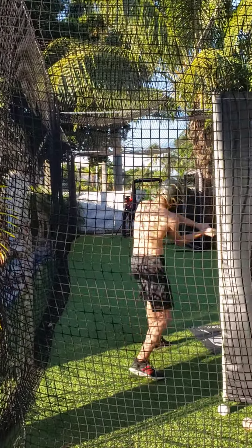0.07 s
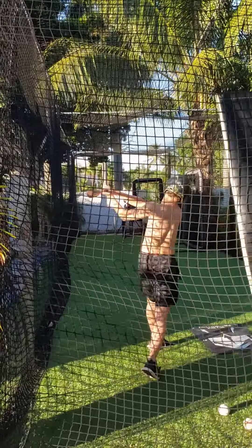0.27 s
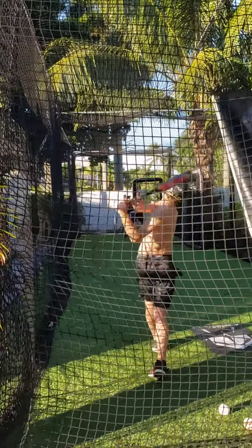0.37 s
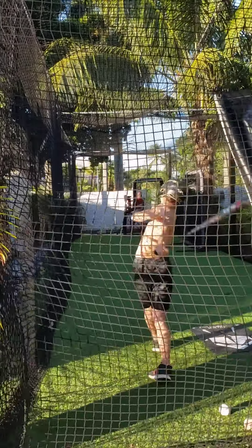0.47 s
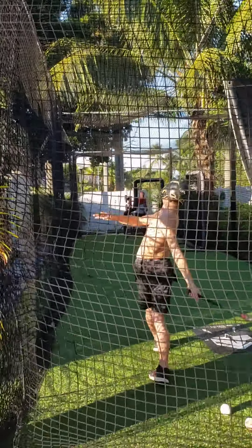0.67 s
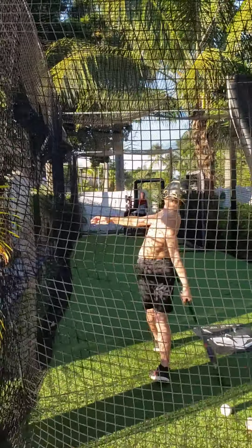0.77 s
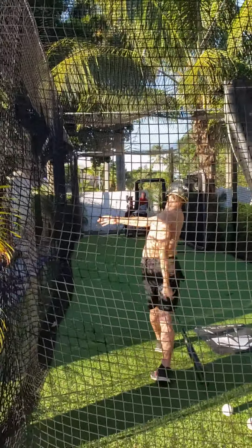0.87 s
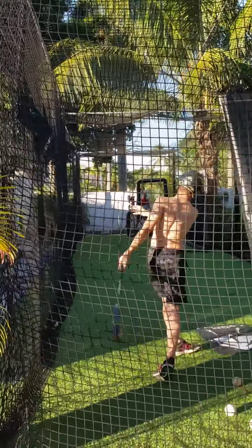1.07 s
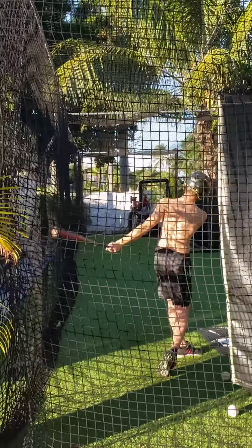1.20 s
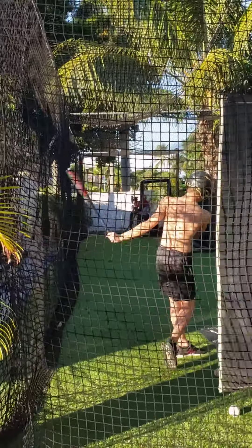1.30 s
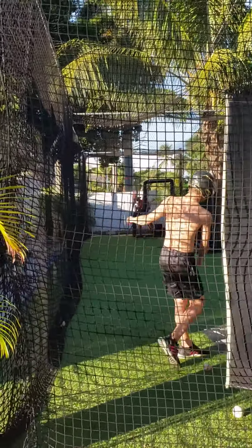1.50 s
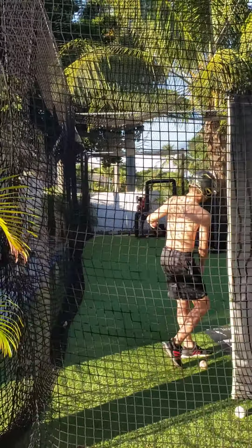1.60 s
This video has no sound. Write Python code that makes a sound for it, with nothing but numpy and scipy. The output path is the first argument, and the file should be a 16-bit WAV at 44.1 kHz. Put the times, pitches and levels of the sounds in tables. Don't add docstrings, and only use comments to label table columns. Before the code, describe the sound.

Outdoor batting cage on a phone microphone: short clanging bat hit, explosive close tarp smack with rustle and cord snap, fading metallic ring, then small dull ball thuds and grass brushes over low hum and faint leaves.

```python
import sys
import numpy as np
from scipy import signal
from scipy.fft import rfft, irfft
from scipy.io import wavfile
from scipy.ndimage import uniform_filter1d

SR = 44100
rng = np.random.default_rng(int(sys.argv[2]) if len(sys.argv) > 2 else 0)


def inscribe(sig):
    pcm = np.round(np.clip(np.atleast_2d(sig).T, -1, 1) * 32767)
    wavfile.write(sys.argv[1], SR, pcm.astype(np.int16))


def invert_db(level):
    return 10 ** (np.asarray(level, dtype=float) / 20)


N = 72765
T = np.arange(N) / SR
HZ = np.maximum(np.fft.rfftfreq(N, 1 / SR), 1)


def over_hz(points):
    p = np.array(points, float)
    return np.interp(np.log(HZ), np.log(p[:, 0]), p[:, 1])


def over_time(points):
    p = np.array(points, float)
    return np.interp(T, p[:, 0], p[:, 1])


# (frequency [Hz], likeness [0-1, clipped])
PORT_LIKENESS = [(60, 2.5), (300, 1.12), (700, 0.7), (1500, .5), (5000, 0.05), (14000, 0.08)]
# (frequency [Hz], phase [rad])
PORT_PHASE = [(300, 0), (2700, -1.3), (4300, 3), (5000, 1), (6200, 7), (8400, -4.5), (12000, -1),
              (16000, -2)]
# (frequency [Hz], left over right [dB])
PORT_BALANCE = [(60, 2.5), (110, 0.5), (200, 2), (380, 2.5), (700, 0), (1290, 3), (2380, 2), (4400, 2.5),
                (8120, 4.5), (15000, -3)]


def ports(a, b, far=False):
    least_likeness = 0.23 if far else 0
    likeness = np.clip(over_hz(PORT_LIKENESS), least_likeness, 1)
    balance = invert_db(over_hz(PORT_BALANCE) / 2)
    shift = 1 if far else np.exp(-1j * over_hz(PORT_PHASE))
    right = likeness * a * shift + np.sqrt(1 - likeness ** 2) * b
    return np.array([irfft(a * balance, N), irfft(right / balance, N)])


def walk(rate_hz):
    k = max(int(SR / rate_hz), 1)
    held = rng.standard_normal(999)[np.arange(N) // k % 999]
    return 0.78 * uniform_filter1d(uniform_filter1d(held, k), k)


def hiss(tone, grain_db=0., flicker_db=0., far=False):
    grains = rng.standard_normal((2, N)) * invert_db(grain_db * rng.exponential(size=N))
    left, other = rfft(grains) * invert_db(over_hz(tone))
    spectrum = rfft(ports(left, other, far))
    out = 0
    for octave in range(4, 15):
        share = np.clip(1 - abs(np.log2(HZ) - octave), 0, 1)
        out = out + irfft(spectrum * share, N) * invert_db(flicker_db * walk(13.59))
    return out / out.std()


def swell(rows):
    power = np.zeros(N)
    for start, db, rise, t60 in rows:
        u = np.maximum(T - start, 0)
        attack = np.sin(np.pi / 2 * np.minimum(u / rise, 1))
        power += (invert_db(db - 60 * u / t60) * attack) ** 2
    return np.sqrt(power)


def ring(start, db, hz, t60, sag=0.):
    u = np.maximum(T - start, 0)
    return invert_db(db - 60 * u / t60) * np.sin(2 * np.pi * (hz * u + sag * u ** 2 / 2))


def push(start, db, ms):
    u = (T - start) / (ms / 1000)
    pulse = np.where((u > 0) & (u < 1), np.sin(np.pi * u), 0)
    return invert_db(db) * pulse * np.pi / 2 / (ms / 1000 * SR)


# (frequency [Hz], density [dB per Hz])
GARDEN_TONE = [(25, 8.5), (50, 3), (120, -4.5), (200, -12), (340, -19), (450, -34.5), (800, -45.5)]
# (time [s], level [dB])
GARDEN_LEVEL = [(0, -43), (.15, -38.5), (.5, -44), (.9, -48), (1.1, -48.5), (1.4, -51.5), (1.65, -52)]


def garden_hum():
    return hiss(GARDEN_TONE, 0.3, 1.7) * invert_db(over_time(GARDEN_LEVEL))


# (frequency [Hz], density [dB per Hz])
LEAVES_TONE = [(300, 1.5), (1000, 0.5), (1700, -3.5), (2500, -8.5), (4000, -12.5), (6500, -13),
               (13000, -16.5), (16500, -12.5)]
# (time [s], level [dB])
LEAVES_LEVEL = [(0, -55), (.17, -53.5), (.5, -59), (.8, -65.5), (.95, -64), (1.1, -65), (1.65, -66.5)]


def leaves():
    return hiss(LEAVES_TONE, 0.96, 0.54, far=True) * invert_db(over_time(LEAVES_LEVEL))


def pump():
    return invert_db(-72) * np.sin(2 * np.pi * 348 * (T + 0.0013 * walk(11.0)))


# (time [s], level [dB], thud [Hz], t60 [s])
BALL_DROPS = [(0.164, -31.5, 93.8, 0.38), (0.074, -33, 75, 0.059), (.6780, -50, 550, .03),
              (0.6954, -31, 334, 0.019), (0.8521, -37.5, 180, 0.044), (.8720, -44, 125.7, 0.14),
              (.9300, -42.5, 124.7, 0.12), (.9600, -40.5, 262, 0.018), (1.2035, -35.5, 217, 0.038),
              (1.4330, -53, 481, 0.08)]


def balls():
    thuds = 0
    for start, db, hz, t60 in BALL_DROPS:
        thuds = thuds + ring(start, db, hz, t60)
        thuds = thuds + ring(start, db - 8.5, hz * 1.73, t60 * 1.1)
        thuds = thuds + ring(start, db - 11, 115, .06)
    return uniform_filter1d(thuds, size=30)


# (time [s], level [dB], rise [s], t60
# [s])
GRASS_SWISHES = [(.3335, -36, 0.001, .03), (.5550, -58, .01, 0.15), (.6500, -58.5, 0.011, 0.26),
                 (.6880, -57, .01, 0.13), (.8440, -55, 0.0086, 0.3), (.8515, -51, .0006, 0.05),
                 (1.1950, -60, .003, 0.1), (1.2022, -51, 0.0005, 0.015)]
# (frequency [Hz], density [dB per Hz])
GRASS_COLOUR = [(300, 2), (1500, 1.5), (4000, -4.5), (6500, -2.5), (9000, -4), (12000, 0), (16000, -7.5)]


def grass():
    return hiss(GRASS_COLOUR, 2.6, 1.6) * swell(GRASS_SWISHES)


# (time [s], level [dB], rise [s], t60 [s])
SCUFFS = [
    (.62, -62, .06, .9),
    (1.4270, -49.5, .006, 0.15),
    (1.4470, -57, .004, .08),
]
# (frequency [Hz], density [dB per Hz])
SCUFF_COLOUR = [(200, -18.5), (500, 5.5), (1000, -7), (2000, -11.5), (3500, -20.5), (8000, -30.5),
                (16000, -27)]


def scuffs():
    return hiss(SCUFF_COLOUR, 1.2, 1.2) * swell(SCUFFS)


# (time [s], level [dB], t60 [s])
HOOK_JINGLES = [(.2900, -37, .11), (.3550, -52, .06), (.3780, -51, .07), (.4000, -59, .2),
                (.4430, -65, .15), (.4900, -69, .15), (.5570, -64, .06), (.5770, -66, .15),
                (.7050, -64, .09), (.8520, -72, .1)]
# (frequency [Hz], level [dB])
HOOK_PARTIALS = [(7790, 7), (7800, -14.5), (7600, -16)]


def hooks():
    detune = 1 + 0.0099 * rng.standard_normal((len(HOOK_JINGLES), 3))
    out = 0
    for k, (hz, mode_db) in enumerate(HOOK_PARTIALS):
        chatter = invert_db(-2 + 5 * walk(500))
        for i, (start, db, t60) in enumerate(HOOK_JINGLES):
            out = out + chatter * ring(start, db + mode_db, hz * detune[i, k], t60)
    return out


# (time [s], level [dB], frequency [Hz], t60 [s])
SNAPS = [(.3338, -15, 3600, .005), (.1910, -38, 7900, .006), (.6948, -41, 480, .035),
         (.8515, -57, 7500, .07), (.8520, -54, 5900, .03), (.8522, -50, 1300, .008),
         (1.2025, -41, 5600, .002), (1.2025, -47, 1600, .006), (1.2040, -46, 450, .03)]


def snaps():
    return sum(ring(*row) for row in SNAPS)


# (time [s], level [dB], rise [s], t60 [s])
RUSTLES = [
    (.2354, -17, 0.00014, 0.041),
    (.2420, -21, 0.0095, 0.24),
    (.2860, -31, 0.002, 0.46),
    (.3680, -39, 0.0067, 0.3),
]
# (frequency [Hz], density [dB per Hz])
RUSTLE_COLOUR = [(300, -3), (600, 0), (1200, -7), (2200, -12), (3200, -11.5), (5600, -18), (7900, -16),
                 (16500, -23)]


def rustle():
    return hiss(RUSTLE_COLOUR, 1.8, 1.0) * swell(RUSTLES)


# (time [s], level [dB], rise [s], t60 [s])
FLAPS = [
    (.2450, -24, 0.0362, 0.51),
    (.3400, -33.5, 0.0053, 0.71),
]
# (frequency [Hz], density [dB per Hz])
FLAP_COLOUR = [(18, -50), (30, -35), (80, -16), (129, -6), (225, -8.5), (256, -10), (297, -9.5), (832, -42),
               (1500, -41), (1950, -64), (3300, -120)]


def flap():
    return hiss(FLAP_COLOUR, 0.2405, 3.5) * swell(FLAPS)


# (time [s], level [dB], contact [ms], polarity)
TARP_BLOWS = [(0.2350, -13, 0.27, -0.74), (0.2354, -2, 0.5, 0.68), (0.254, -20.5, 1.3, 0.86),
              (0.2855, -11, 1.1, -0.71), (.3560, -23, 2.23, 0.91), (.3900, -17, 2.03, 0.024),
              (0.452, -27, 2.48, 0.99), (0.561, -21, 5.54, 0.98)]
# (frequency [Hz], level [dB], t60 [s])
TARP_MODES = [(55, -14, 0.072), (106, -47, 0.17), (128, -32.5, 0.057), (196, -21.5, 0.027),
              (252, -15, 0.069), (409, 4.5, 0.014), (447, -14.5, 0.15), (527, -8.5, 0.0496),
              (690, -33, 0.017), (980, -17, 0.022), (1227, -12, 0.02), (1744, -20, 0.34),
              (2600, -21.5, 0.018), (4100, -56, .01)]
# (time [s], level [dB], frequency [Hz], t60 [s])
BILLOWS = [(.2400, -24, 60, .08), (.2408, 0, 128, .016), (.2874, -8, 175, .02), (.2907, -8, 170, .028),
           (.3040, -19, 115, .12), (.3354, -13, 165, .045), (.3485, -24, 122, .18), (.3890, -23, 140, .07)]
BILLOW_SIGNS = [1, 1, 1, -1, 1, 1, 1, 1]
# (frequency [Hz], level [dB], t60 [s])
SLAP_MODES = [(930, -18, .06), (640, -17, .08), (1500, -22, .01), (1745, -25, .12), (2600, -20, .005),
              (3080, -30, .12), (4100, -28, .005)]


def tarp():
    force = sum(sign * push(start, db, ms) for start, db, ms, sign in TARP_BLOWS)
    body = sum(ring(0, db, hz, t60) for hz, db, t60 in TARP_MODES)
    boom = signal.fftconvolve(force, body)[:N]
    billow = sum(sign * ring(*row) for sign, row in zip(BILLOW_SIGNS, BILLOWS))
    slap = sum(ring(.2354, db, hz, t60) for hz, db, t60 in SLAP_MODES)
    return boom + uniform_filter1d(billow, size=40) + slap


# (time [s], level [dB], rise [s], t60 [s])
CRACK_BURSTS = [
    (.1772, -33.5, 0.001, 0.066),
    (0.1790, -37.5, 0.0013, 0.27),
    (0.186, -43.5, 0.0083, 0.26),
]
# (frequency [Hz], density [dB per Hz])
CRACK_COLOUR = [(200, -1), (500, -6), (1600, -6.5), (4500, -14), (8600, -18.5), (12500, -14.5),
                (14200, -14), (16500, -19)]
# (time [s], level [dB], rise [s], t60 [s])
SIZZLES = [
    (.1785, -34, 0.00204, .09),
]
# (frequency [Hz], density [dB per Hz])
SIZZLE_COLOUR = [(9000, -36.5), (12000, -15), (14000, 4), (15500, -6)]


def crack_air():
    burst = hiss(CRACK_COLOUR, 1.5, 0.66) * swell(CRACK_BURSTS)
    return burst + hiss(SIZZLE_COLOUR, 1.5) * swell(SIZZLES)


# (frequency [Hz], level [dB], t60 [s], pitch sag from the swing [Hz per s])
BARREL_MODES = [(1575, -33, .26, -900), (1793, -43, .1, 0), (560, -21, .016, 0), (1100, -26, .008, 0)]
# (time [s], level [dB])
RING_LEVEL = [(.41, -56), (.432, -54), (.465, -56), (.49, -54), (.54, -58), (.66, -61), (.734, -63),
              (.78, -69), (.83, -80)]
# (time [s], level [dB])
TOP_LEVEL = [(.41, -61), (.464, -68), (.56, -69), (.65, -75), (.735, -76), (.762, -70), (.785, -82),
             (.83, -92)]


def bat():
    strike = sum(ring(.1772, db, hz, t60, sag) for hz, db, t60, sag in BARREL_MODES)
    fade_in = np.clip((T - RING_LEVEL[0][0]) / .007, 0, 1)
    fade_out = np.clip((RING_LEVEL[-1][0] - T) / .02, 0, 1)
    u = T - .505
    beat = 1 - invert_db(-3) * np.exp(-(u / .06) ** 2) * np.cos(2 * np.pi * 27.5 * u)
    tone = invert_db(over_time(RING_LEVEL) + 1.5 * walk(60)) * beat * np.sin(2 * np.pi * 1667 * T)
    top = invert_db(over_time(TOP_LEVEL) + 3 * walk(90)) * np.sin(2 * np.pi * 2790 * T)
    return strike + np.sqrt(2) * fade_in * fade_out * (tone + top)


def echoes(x):
    tail = rng.standard_normal(N) * invert_db(-60 * T / .025)
    tail = tail / np.sqrt(np.sum(tail ** 2))
    return rfft(x) * rfft(tail) * HZ ** 2 / (HZ ** 2 + 600 ** 2)


def scene():
    floor = garden_hum() + leaves()
    solid = pump() + balls() + hooks() + snaps() + tarp()
    near = ports(rfft(solid) + invert_db(-11) * echoes(solid), echoes(solid))
    air = grass() + scuffs() + rustle() + flap() + crack_air()
    return floor + near + air + ports(rfft(bat()), 0)


def band_limit(x):
    return signal.sosfilt(signal.butter(12, 16820, fs=SR, output="sos"), x)


def record(dry):
    bass_cut = signal.butter(3, 44.2, "high", fs=SR, output="sos")
    top_cut = signal.ellip(8, .3, 60, 15900, fs=SR, output="sos")
    rounded = np.tanh(0.69 * signal.sosfilt(bass_cut, dry)) / 0.53
    mix = signal.sosfilt(top_cut, rounded)
    return band_limit(mix)


dry = scene()
out = record(dry)
inscribe(out)
```